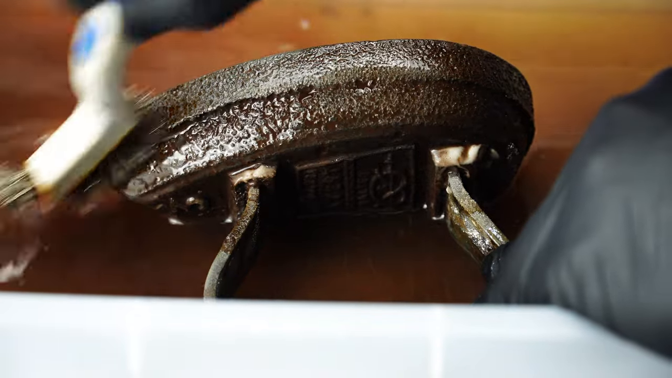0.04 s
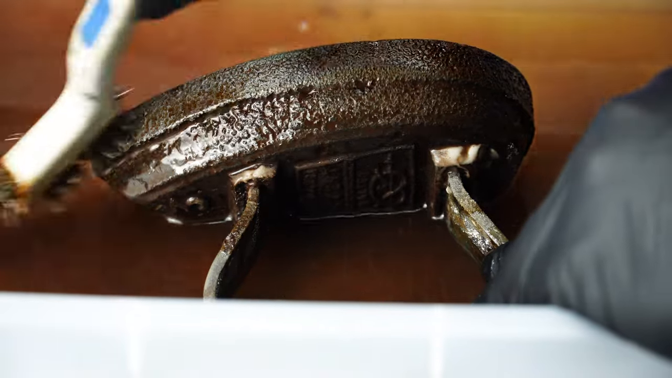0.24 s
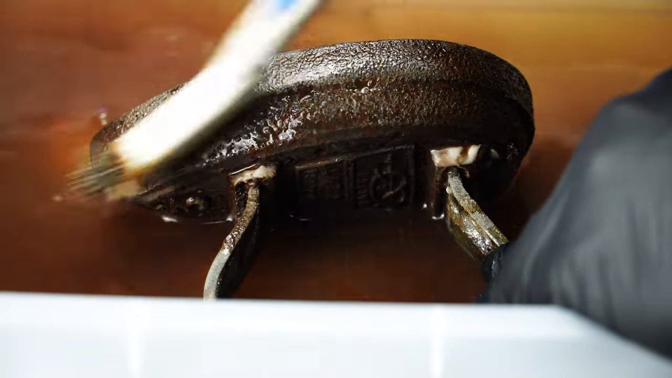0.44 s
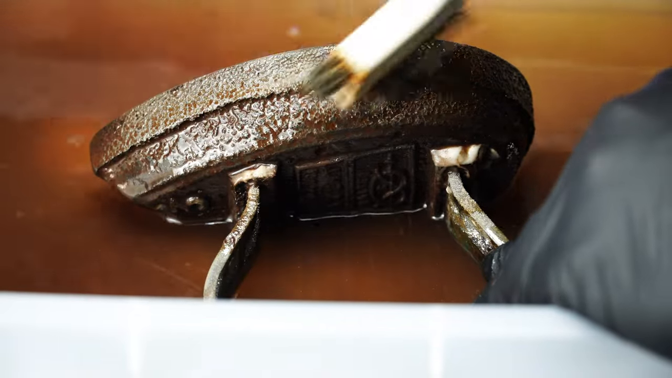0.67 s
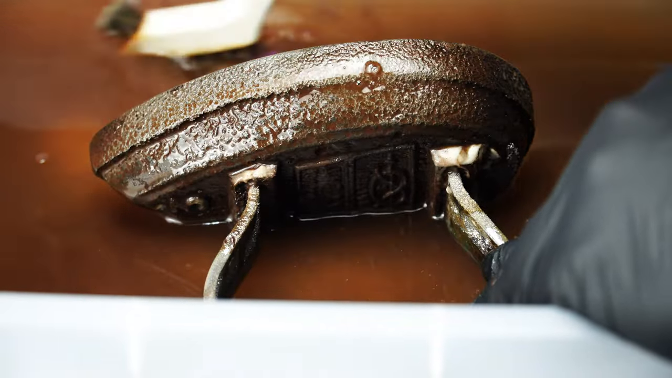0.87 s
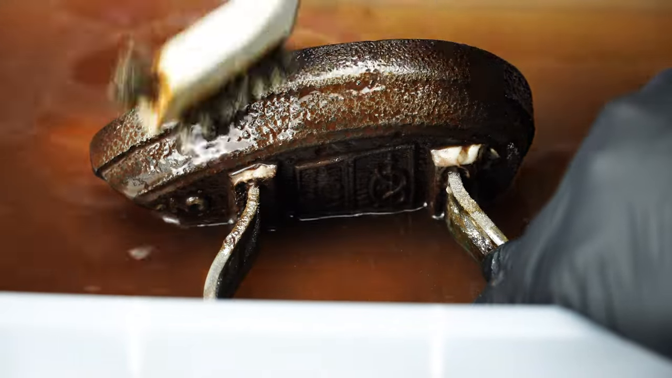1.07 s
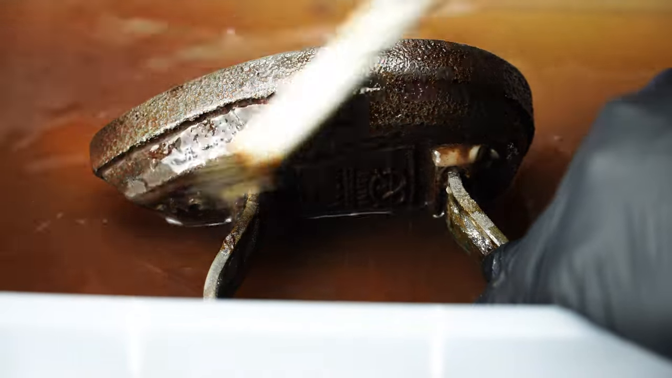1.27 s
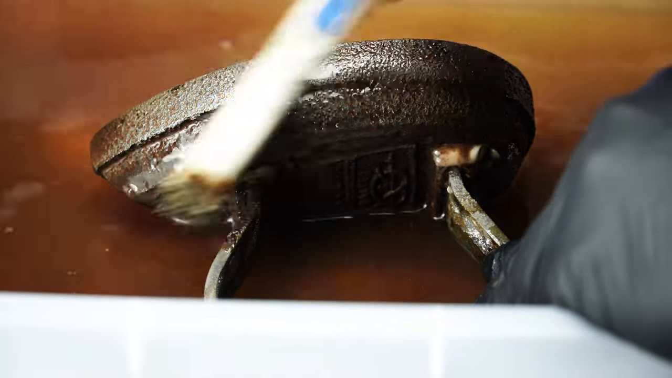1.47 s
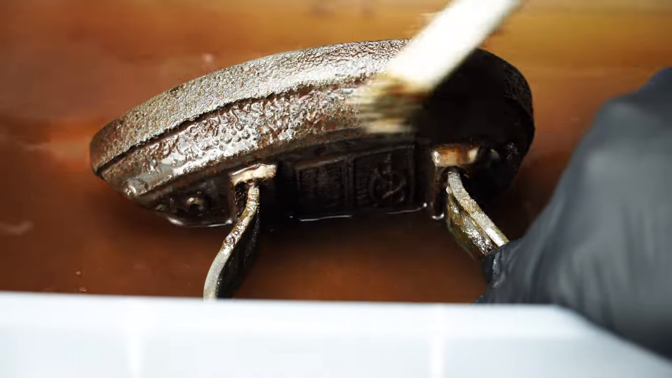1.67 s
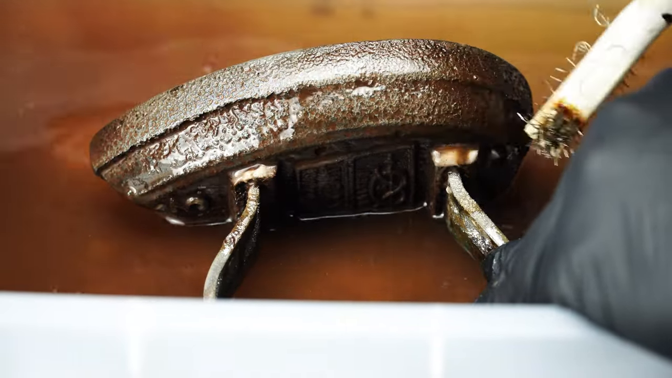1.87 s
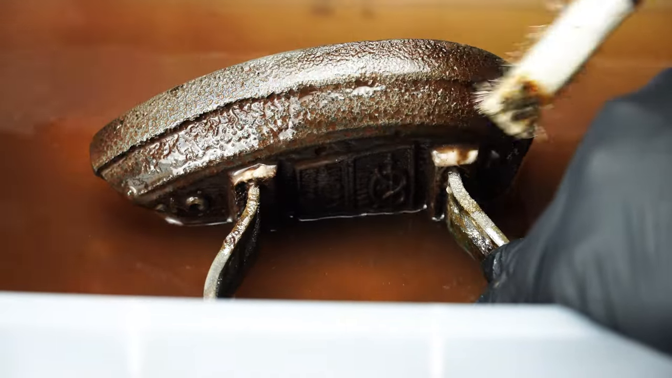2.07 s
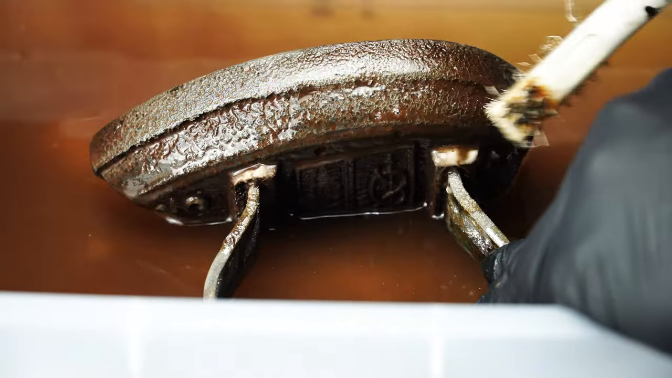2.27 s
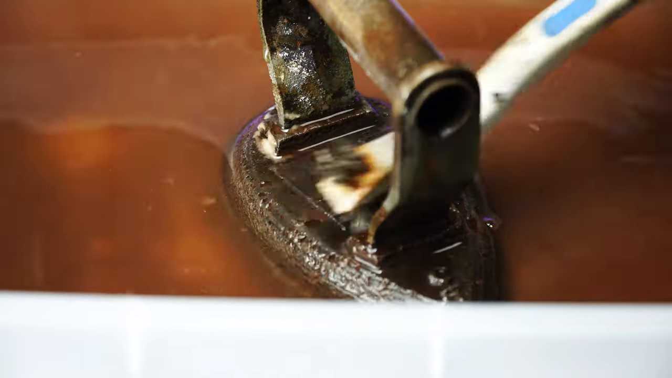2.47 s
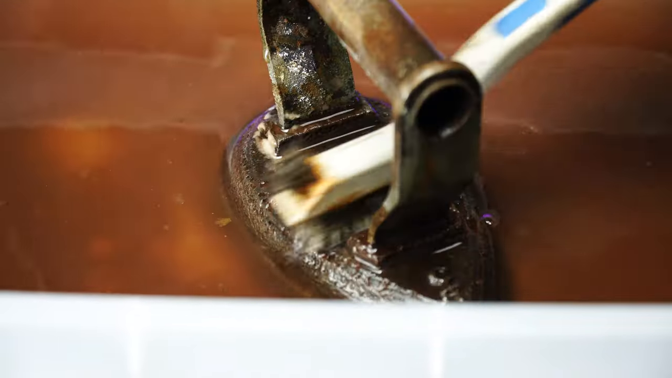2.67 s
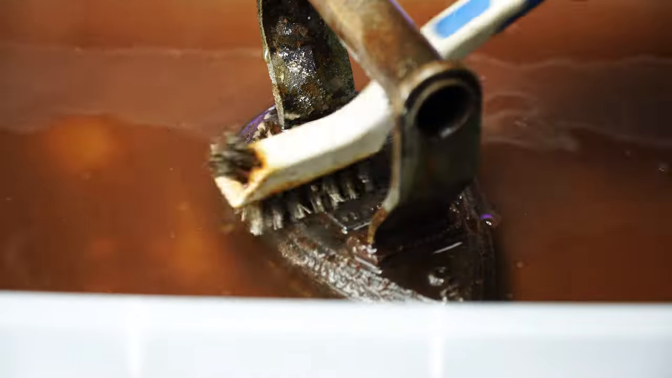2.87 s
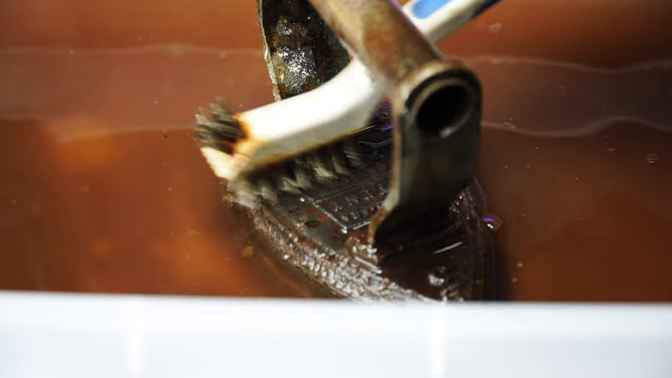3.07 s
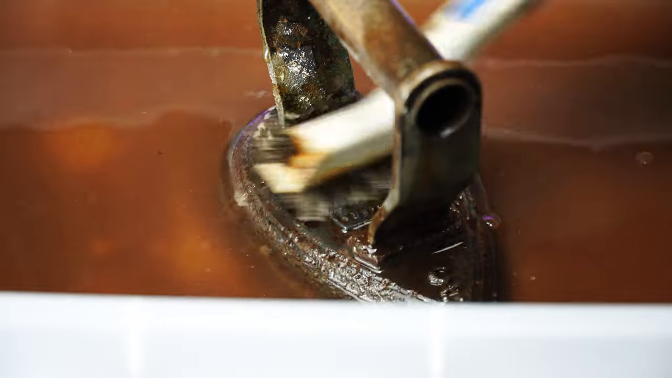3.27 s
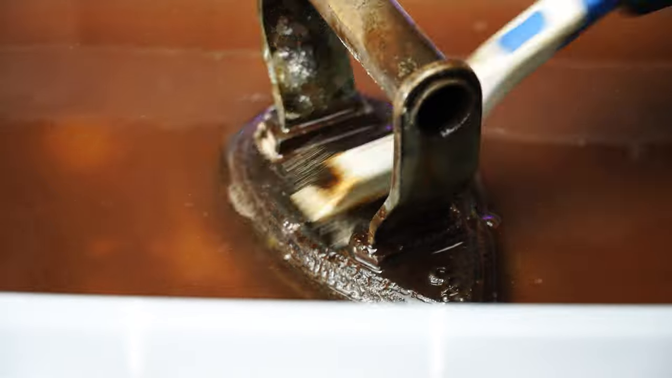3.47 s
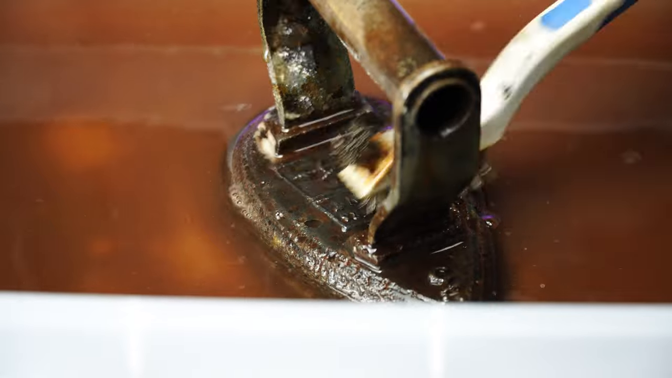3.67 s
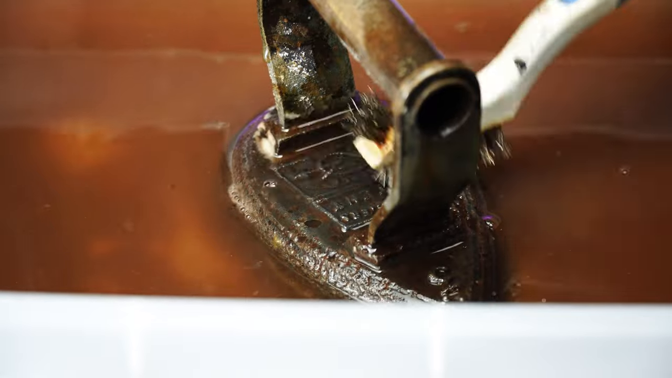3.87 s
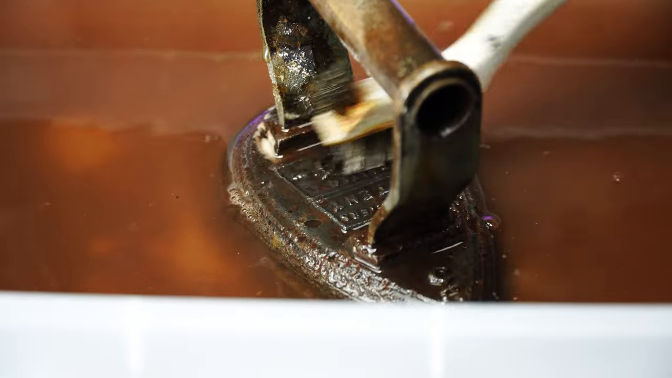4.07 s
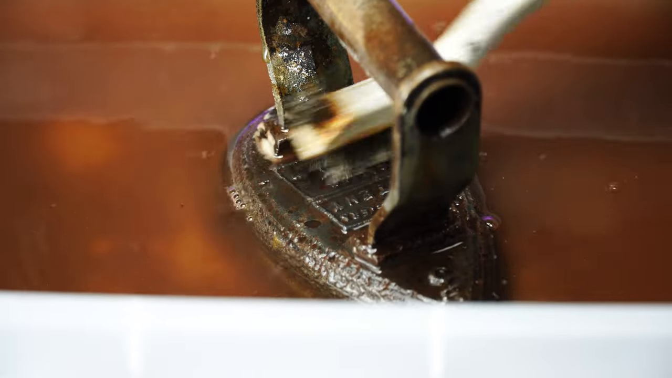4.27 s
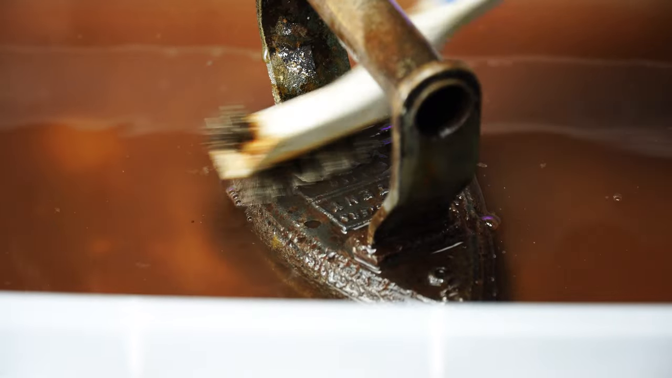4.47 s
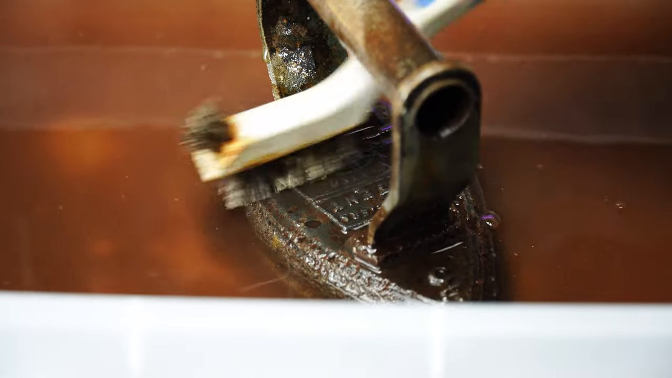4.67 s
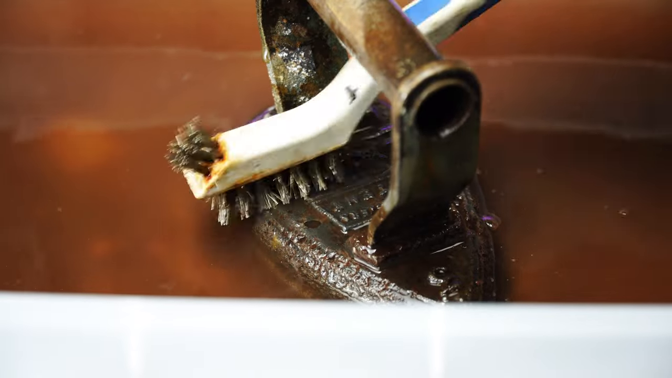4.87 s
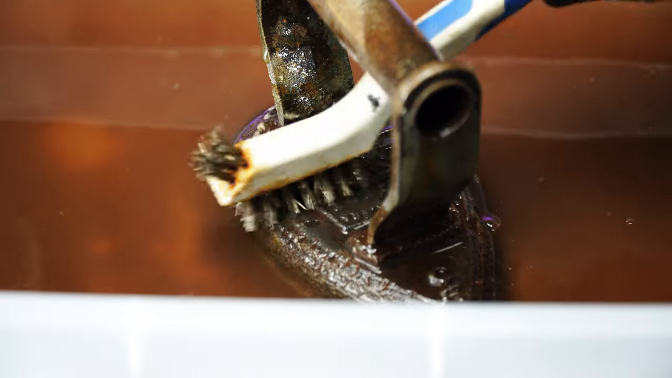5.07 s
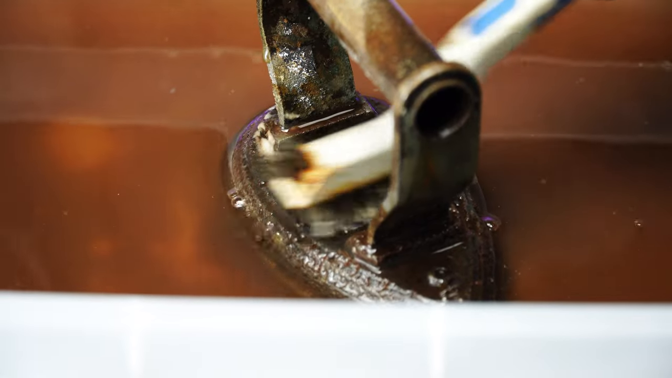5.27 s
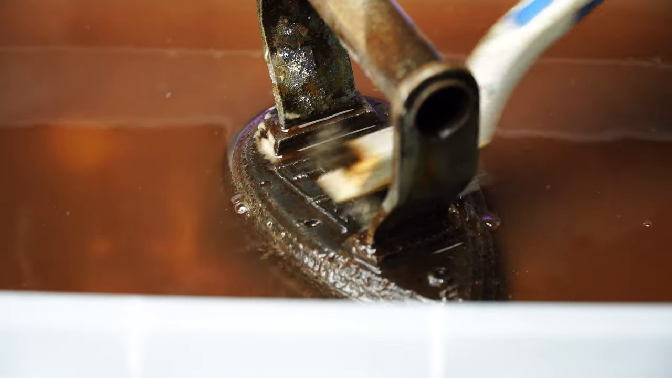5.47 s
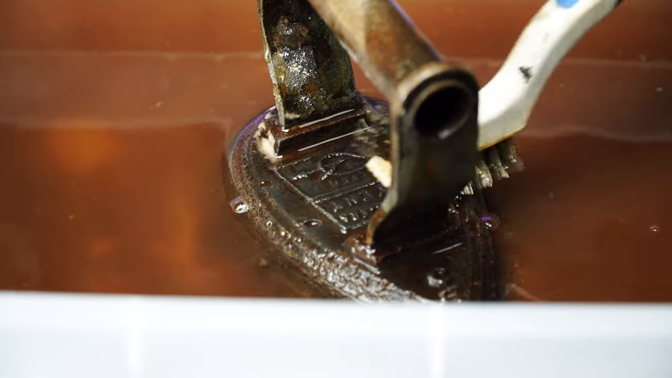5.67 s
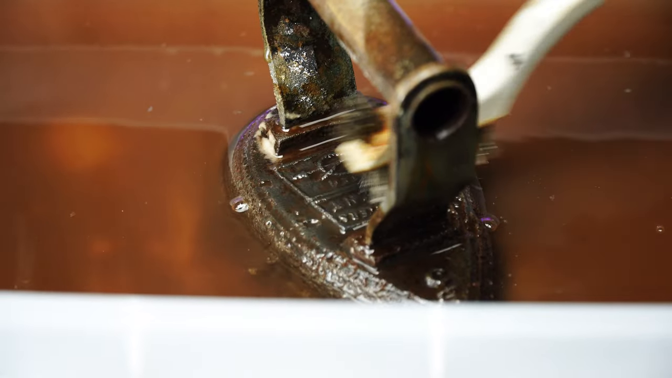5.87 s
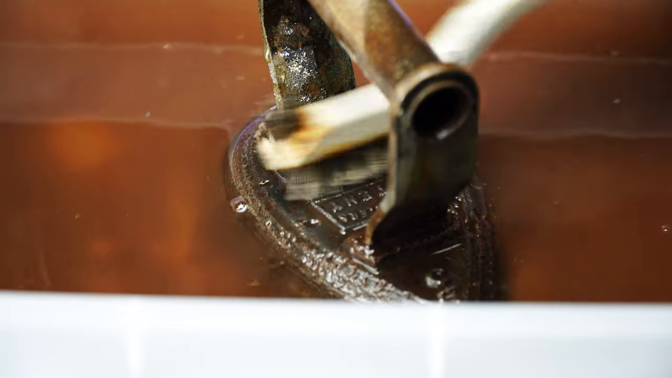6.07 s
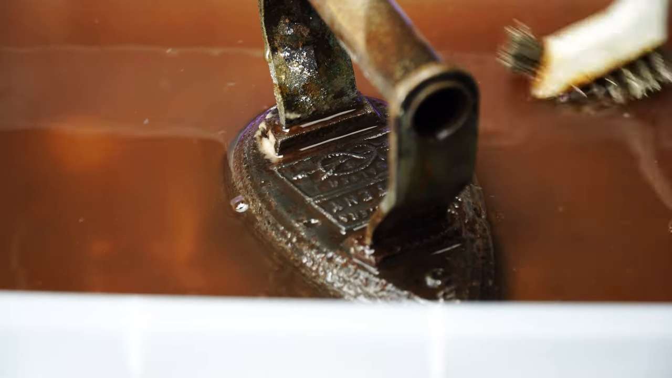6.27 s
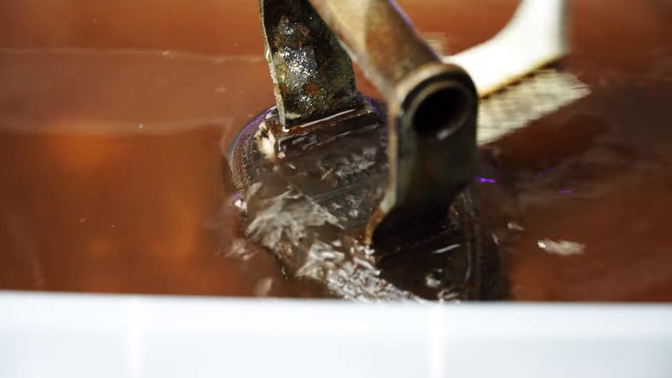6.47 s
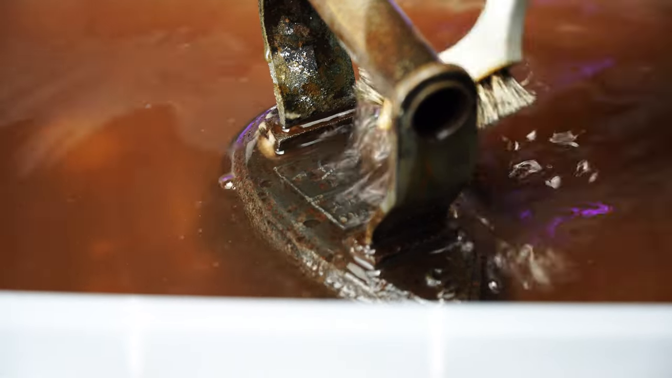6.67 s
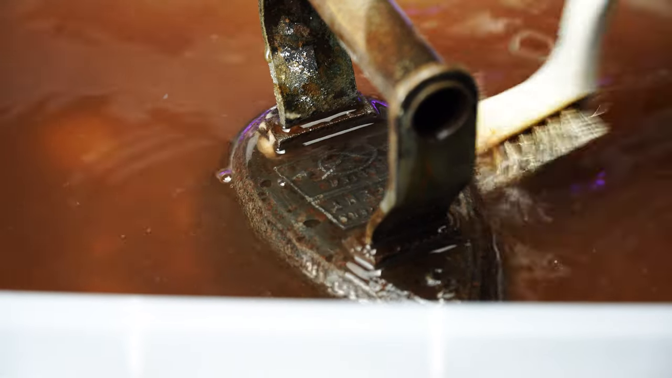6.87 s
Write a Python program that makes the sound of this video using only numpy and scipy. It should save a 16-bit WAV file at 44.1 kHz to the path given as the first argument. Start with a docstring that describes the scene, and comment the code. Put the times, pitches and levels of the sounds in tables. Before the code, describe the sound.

A small brush scrubs rough wet metal in a water-filled plastic tub. The first strokes are crisp and hissy, with low knocks; the brush leaves, dips with a plop and bubbles, and returns unevenly with little squeaks. After a tiny drop in level, about ten fast strokes a second follow, grittier and faintly ringing. Light drips and swishes close it. Dry, close pickup, quiet workshop air.

```python
"""A toothbrush scrubs a wet, rusty flat iron standing in a plastic tub of water: long strokes along the rim.
It pauses, and the brush dips into the water (noise splashes, chirped sine bubbles); the rim strokes resume.
The level dips briefly, then quick strokes run on top until the brush lifts and the water splashes on.
Bristles are dense random clicks that ring the iron's modes; jolts shake the tub's; tufts snag in click bursts.
Quiet workshop air, coloured noise, lies under it all."""
import sys
import numpy as np
from scipy import signal
from scipy.fft import rfft, irfft, next_fast_len
from scipy.io import wavfile
from scipy.ndimage import uniform_filter1d

SR = 44100
rng = np.random.default_rng(int(sys.argv[2]) if len(sys.argv) > 2 else 0)


def transcribe(u):
    """Save the signal u as a 16-bit wav file named by the first command-line argument.

    u: samples, shape (n,) or (channels, n), limited to [-1, 1]; the rate is SR.
    q: integer samples, one column per channel.
    """
    v = np.clip(np.atleast_2d(u).T, -1, 1)
    q = np.round(v * 32767).astype(np.int16)
    wavfile.write(sys.argv[1], SR, q)


N = 305613

# strokes, each until the next turn or lift: (start_s, level_db)
RIM_STROKES = [(-.025, -41), (.067, -38), (.192, -39.5), (.286, -40), (.430, -40), (.576, -40),
               (1.152, -45.5), (1.274, -39.5), (1.464, -40), (1.708, -40), (1.803, -39.5), (1.936, -52.5),
               (2.068, -43.5), (2.161, -41.5), (2.257, -42.5), (2.335, -41), (2.42, -44.5)]
TOP_STROKES = [(2.518, -42), (2.597, -47.5), (2.673, -44.5), (2.774, -40), (2.853, -39.5), (2.945, -43),
               (3.026, -40.5), (3.121, -42.5), (3.204, -41.5), (3.296, -40), (3.378, -38), (3.477, -41),
               (3.564, -38), (3.662, -38.5), (3.738, -37.5), (3.826, -40), (3.927, -37), (4.024, -39.5),
               (4.116, -38), (4.205, -41.5), (4.301, -40), (4.393, -42), (4.486, -38), (4.584, -41),
               (4.668, -36.5), (4.75, -40), (4.844, -38.5), (4.937, -39.5), (5.046, -38.5), (5.128, -40),
               (5.223, -38.5), (5.312, -40.5), (5.387, -38.5), (5.481, -41.5), (5.57, -37.5), (5.662, -39),
               (5.739, -36.5), (5.829, -39.5), (5.906, -39), (6.008, -40), (6.086, -38), (6.179, -43)]
# hand control: (time_s, fastest_point [0-1 of stroke], turn_pause_s [< 0: strokes overlap], rasp_db [before scaling])
RIM_HAND = [(0, 0.59, 0.025, -6.5), (.25, 0.36, 0.011, -1), (.65, 0.44, 0.014, -8),
            (1.2, 0.47, -0.0065, -3), (1.36, 0.41, 0.022, -5), (1.57, 0.41, 0.031, 0.5),
            (1.75, 0.34, 0.0093, -1), (1.86, 0.24, 0.026, -7.5), (2.1, 0.41, 0.023, 0),
            (2.45, 0.5, 0.026, -7.5)]
TOP_HAND = [(2.55, 0.52, 0.031, -1.5), (2.64, 0.36, 0.0027, 3), (2.85, 0.41, 0.012, 0),
            (3.2, 0.5, 0.0039, 1.5), (3.42, 0.4, -0.013, -1.5), (3.62, 0.34, -0.0056, -2.5),
            (3.85, 0.45, -0.0098, -0.5), (4.05, 0.49, 0.015, -0.5), (4.45, 0.32, 0.003, -1),
            (4.62, 0.36, 0.0027, -5.5), (4.98, 0.51, 0.014, -4.5), (5.42, 0.43, 0.0065, -0.5),
            (5.75, 0.53, 0.013, -2), (6.04, 0.44, 0.002, -6.5), (6.22, .44, 0.023, -4)]
# bristle click colour: (freq_hz, level_db)
RIM_HISS = [(530, -22), (900, -14), (1000, -25.5), (1400, -20), (1770, -17), (2070, -7), (2330, -10),
            (3000, -10.5), (3670, -5.5), (4710, -6), (5180, -2.5), (6500, -5.5), (8440, 0.5), (9980, -1.5),
            (15500, -1)]
TOP_HISS = [(530, -16.5), (900, -24.5), (1370, -23), (1750, -18.5), (2400, -14.5), (3110, -8), (4000, -8.5),
            (4710, -6.5), (6970, -8), (8150, -1.5), (9290, -3.5), (15500, -1.5)]
# tub modes, shaken through the iron: (freq_hz, width_hz, level_db)
RIM_TUB = [(44.6, 17, -29), (135.3, 14.7, 0), (169.6, 12, -6.5), (210, 15, 1.5), (308, 18.6, -7),
           (398, 38, -9), (705, 36, -23.5), (795, 120, -29)]
TOP_TUB = [(44, 81, -21), (132.2, 19, -0.5), (159.2, 16.4, 2.5), (224.4, 33, -8), (302, 31.5, -13.5),
           (397, 59, -11.5), (705, 65, -17), (880, 270, -25.5)]
# modes of the iron and its handle: (freq_hz, width_hz, level_db)
IRON_MODES = [(1766, 130, -14), (2164, 45, 0), (2958, 10, 9.5), (4020, 51, -25), (4780, 170, -15),
              (6250, 200, -5), (8040, 230, -5.5), (8170, 160, 0)]


def scrub(strokes, hand, hiss, tub, hiss_db, iron_db, tub_db, iron_gain, tub_gain, click_rate_hz, click_spread_db,
          rough_db, judder_db, push_bite, pull_bite):
    """Bristles flick over the rust, more of them the faster the brush; their drag rings the iron, shakes the tub."""
    speed, stroke_db, rasp_db = motion(strokes, hand, push_bite, pull_bite)
    effort_db = stroke_db - np.median(np.array(strokes)[:, 1])
    force = speed * undb(stroke_db + rough_db * walk(260))

    flicks = clicks(click_rate_hz * (0.2 + speed), click_spread_db)
    bristles = bounce(unit(colour(flicks, hiss)), lag_s=0.0011, share=0.24)
    # bent tufts rasp lower than upright ones
    rasp_gain = undb(1.08 * (rasp_db + 5.5))
    bristles += (rasp_gain - 1) * resonance(bristles, 5510, 2350)
    # five fixed bands of the rasp swell and fade at random, each on its own
    for hz in (3680, 4470, 4950, 6260, 8180):
        band_gain = undb(3.7 * walk(35) - 0.63)
        bristles += (band_gain - 1) * resonance(bristles, hz, hz / 10)

    # hard strokes ring the iron out of proportion; each mode's drive wanders with the touch
    rub = flicks * force * undb(iron_gain * effort_db)
    iron = sum(undb(mode_db + 1.4 * walk(14)) * resonance(rub, hz, width_hz)
               for hz, width_hz, mode_db in IRON_MODES)

    jolts = clicks(2500, 2.24) * undb(judder_db * walk(70))
    judder = ring(jolts, tub, wander_db=3.5)
    # level out slow swings, so that the hand sets each stroke's strength
    judder /= np.sqrt(uniform_filter1d(judder ** 2, size=3000) + 1e-18)
    # drag falls a little more slowly than speed
    drag = speed ** 0.85
    thrum = judder * drag * undb(tub_gain * effort_db)
    return undb(hiss_db) * bristles * force + undb(iron_db) * iron + undb(tub_db) * thrum


# brush leaves the iron: time_s
LIFTS = [0.741, 2.002, 2.502, 6.255]


def motion(strokes, hand, push_bite, pull_bite, rest=0.24, lift_s=0.009, bite_s=0.014, flip_s=0.0083,
           bite_spread_db=0.5):
    """Brush speed (an arch per stroke over a slow creep), each stroke's level and its rasp."""
    t = np.arange(N) / SR
    start_s, level_db = np.transpose(strokes)
    hand_s, *controls = np.transpose(hand)
    turn_s = np.append(start_s[1:], np.inf)
    next_lift_s = np.array([min(s for s in LIFTS if s > a) for a in start_s])
    middle_s = (start_s + np.minimum(turn_s, next_lift_s)) / 2
    fastest, pause_s, rasp_db = (np.interp(middle_s, hand_s, c) for c in controls)
    end_s = np.where(next_lift_s < turn_s, next_lift_s, turn_s - pause_s)

    # pushes and pulls alternate, each with its own bite
    bites = np.resize([push_bite, pull_bite], len(start_s))
    bites = bites * undb(bite_spread_db * rng.standard_normal(len(start_s)))
    on_off_s = [start_s[0] - lift_s / 2, start_s[0], end_s[-1], end_s[-1] + lift_s / 2]
    speed = rest * np.interp(t, on_off_s, [0, 1, 1, 0])
    for a, b, top, bite in zip(start_s, end_s, np.clip(fastest, 0.1, 0.9), bites):
        on = slice(max(int(a * SR), 0), int(b * SR))
        way = np.clip((t[on] - a) / (b - a), 0, 1)
        # skewed arch, peak at way = top
        speed[on] += np.sin(np.pi * way ** (np.log(0.5) / np.log(top)))
        # just after the turn the bent bristles flip over together
        since_s = t[on] - a - flip_s
        speed[on] += bite * (since_s > 0) * np.exp(-np.abs(since_s) / bite_s)

    # in a long gap the brush leaves the iron
    for a, b in zip(end_s[:-1], start_s[1:]):
        if b - a > 0.05:
            off_s = a + 2 * lift_s
            speed *= np.interp(t, [a, off_s, max(b - lift_s / 2, off_s), b], [1, 0, 0, 1])

    # hold each value through its stroke, glide between strokes
    held_s = np.column_stack([start_s + lift_s, end_s - lift_s]).ravel()
    return [speed] + [np.interp(t, held_s, np.repeat(c, 2)) for c in (level_db, rasp_db)]


# tufts that snag hard and snap free: (time_s, level_db)
SNAGS = [(.073, -42), (.196, -33), (0.444, -30.5), (1.167, -38), (1.478, -37), (1.719, -34), (2.168, -39),
         (2.343, -34.5), (2.524, -41), (2.604, -39.5), (2.865, -38), (3.221, -36.5), (3.259, -35.5),
         (3.337, -30), (3.614, -37), (3.669, -35), (3.974, -28.5), (4.123, -41), (4.218, -34), (4.311, -38),
         (4.347, -28.5), (4.523, -35), (4.599, -34), (5.056, -35.5), (5.140, -41), (5.234, -35),
         (5.267, -26.5), (5.444, -30), (5.580, -34.5), (5.674, -38), (5.780, -29), (5.956, -35),
         (6.189, -35)]


def snags(rise_s=0.0032, fall_s=0.0058):
    """A tuft catches and lets go: a short, bright burst of clicks."""
    t, burst = np.arange(N) / SR, np.zeros(N)
    for time_s, level_db in SNAGS:
        near = slice(int((time_s - 4 * rise_s) * SR), int((time_s + 4 * fall_s) * SR))
        since_s = t[near] - time_s
        burst[near] += undb(level_db) * np.exp(np.minimum(since_s / rise_s, -since_s / fall_s))
    return burst * unit(colour(clicks(7000, 1.7), TOP_HISS))


# wet tufts squeak on the metal: (time_s, level_db)
SQUEAKS = [(0.215, -41.5), (0.452, -39.5), (1.228, -43.5), (1.54, -45), (5.013, -42), (5.186, -46),
           (5.360, -45)]


def squeaks(hz=5300, width_hz=700, length_s=0.015):
    """Bristles stick and slip near one pitch for a moment: narrow-band noise under a bell-shaped swell."""
    t, out = np.arange(N) / SR, np.zeros(N)
    for time_s, level_db in SQUEAKS:
        near_s = t[np.abs(t - time_s) < 3 * length_s]
        noise = rng.standard_normal(len(near_s))
        tone = unit(resonance(resonance(noise, hz, width_hz), hz, width_hz))
        swell = np.exp(-((near_s - time_s) / length_s) ** 2)
        add(out, near_s[0], undb(level_db) * tone * swell)
    return out


# hard rubs that make the iron sing: (peak_s, mode_2200hz_db, mode_3000hz_db)
SINGS = [(3.40, -66, -48), (3.47, -68, -48), (3.785, -63, -45), (4.075, -66, -50), (4.164, -51, -61),
         (4.35, -56, -52), (4.525, -50, -44.5), (4.70, -65, -51), (5.27, -53, -59), (5.615, -50, -58.5),
         (5.81, -62, -46.5), (5.936, -61, -48)]


def singing(swell_s=0.01898, fade_s=0.02):
    """A hard rub swells the iron's two clearest modes, which then die away."""
    t, out = np.arange(SR // 6) / SR, np.zeros(N)
    shape = np.minimum(t / swell_s, 1) * np.exp(-np.maximum(t - swell_s, 0) / fade_s)
    for peak_s, *levels_db in SINGS:
        for (hz, _, _), level_db in zip(IRON_MODES[1:3], levels_db):
            phase = 2 * np.pi * rng.random()
            add(out, peak_s - swell_s, undb(level_db) * shape * np.sin(2 * np.pi * hz * t + phase))
    return out


# brush head bumps the iron: (start_s, thud_hz, thud_peak_db, tick_peak_db)
BUMPS = [(0.013, 315, -50, -60), (.125, 430, -58, -60), (0.21, 278, -45.5, -58), (.232, 300, -47, -60),
         (0.469, 137, -43, -59), (.494, 135, -41.5, -44), (.535, 135, -44, -60), (.645, 222, -47, -60),
         (1.118, 155, -31.5, -33), (1.118, 242, -40, -60), (1.34, 144, -42.5, -60), (1.368, 135, -44, -60),
         (1.654, 224, -47, -60), (1.711, 333, -45.5, -60), (1.808, 292, -43, -65), (1.828, 348, -42.5, -82),
         (1.849, 226, -41.5, -60), (2.036, 143, -42, -62), (2.105, 330, -53, -60), (2.254, 214, -43.5, -51),
         (2.267, 370, -45, -60), (2.354, 350, -52, -60), (2.429, 340, -46, -64), (2.462, 257, -42.5, -58),
         (2.875, 157, -42.5, -57), (3.12, 160, -41, -54), (3.476, 159, -38, -75), (3.533, 166, -49, -60),
         (3.864, 150, -39, -66), (3.896, 161, -43, -60), (4.947, 151, -42, -55), (5.071, 158, -46, -60),
         (5.232, 157, -38, -50), (5.783, 140, -39, -63), (6.238, 160, -47, -64)]


def bumps(rise_s=0.0034, thud_s=0.011, tick_s=0.0019, knock_db=-13):
    """The plastic head ticks on the iron; the tub answers with a low thud and a knock of its upper resonances."""
    t, out = np.arange(SR // 8) / SR, np.zeros(N)
    knock = sum(np.sin(2 * np.pi * hz * t) * np.exp(-np.pi * width_hz * t) for hz, width_hz, _ in RIM_TUB[4:6]) / 2
    for start_s, thud_hz, thud_db, tick_db in BUMPS:
        thud = np.sin(2 * np.pi * thud_hz * t) * (1 - np.exp(-(t / rise_s) ** 2)) * np.exp(-t / thud_s)
        tick = rng.standard_normal(len(t)) * np.exp(-t / tick_s)
        tick = resonance(resonance(tick, 3500, 3500), 3600, 2100)
        answer = thud / np.abs(thud).max() + undb(knock_db) * knock
        add(out, start_s, undb(thud_db) * answer + undb(tick_db) * tick / np.abs(tick).max())
    return out


# splashes, deep plops to high spatter: (start_s, level_db, centre_hz, decay_s)
SPLASHES = [(0.822, -64, 4470, 0.027), (.884, -49, 3580, 0.0016), (.910, -43.5, 440, 0.009),
            (0.912, -62, 2660, 0.018), (.915, -56.5, 854, 0.068), (0.988, -55.5, 253, 0.0076),
            (0.992, -60.5, 4170, 0.017), (1.006, -48, 6850, 0.0014), (1.021, -55.5, 9400, 0.0087),
            (1.097, -58.5, 3700, 0.016), (1.116, -54.5, 7000, 0.021), (2.034, -58.5, 6370, 0.014),
            (2.380, -54.5, 720, 0.026), (6.309, -55.5, 4140, 0.0057), (6.327, -58.5, 840, 0.011),
            (6.366, -53.5, 565, 0.00997), (6.368, -61, 3220, 0.02), (6.44, -58, 4170, 0.015),
            (6.579, -65.5, 3480, 0.021), (6.580, -73, 550, 0.047), (6.638, -68.5, 2510, 0.014),
            (6.688, -63.5, 157, 0.013), (6.692, -58.5, 3460, 0.0084), (6.747, -70, 4500, 0.0027),
            (6.822, -72, 5000, .01), (6.838, -59.5, 3220, 0.0095), (6.838, -70, 720, 0.024),
            (6.885, -61, 2960, 0.002)]
# bubbles: (start_s, start_hz, tone_peak_db, t60_s)
BUBBLES = [(0.913, 360, -43, 0.04), (.913, 849, -48.5, 0.21), (0.917, 1050, -57, .1),
           (0.998, 1302, -52, 0.07), (1.005, 1335, -40.5, 0.025), (1.009, 1340, -58, 0.23),
           (2.378, 693, -48, 0.17), (6.371, 690, -56, .05), (6.434, 2200, -49, 0.018),
           (6.444, 4480, -53, 0.021), (6.599, 3300, -51.5, .016), (6.698, 2110, -55.5, .045),
           (6.884, 3020, -46.5, 0.015)]


def water(glide_per_s=0.28, mist_db=-9, iron_db=-3, breadth=1.97, rise_share=0.55, longest_rise_s=0.0088,
          wash_db=-24, wash_s=0.053, pop_db=-10, pop_s=0.0019, droplet_db=-3):
    """Splashes are crackle and droplets under a fine mist; trapped bubbles pop, ring and rise a little in pitch."""
    t, out = np.arange(SR // 4) / SR, np.zeros(N)
    crackle = clicks(7800, 3.4)
    for start_s, level_db, hz, decay_s in SPLASHES:
        drops = np.roll(crackle, -int(start_s * SR))[:len(t)]
        spray = unit(resonance(resonance(drops, hz, breadth * hz), hz, breadth * hz))
        # deep plops throw less mist than high spatter
        mist = min(hz / 3000, 1) ** 2 * unit(resonance(drops[::-1], 14300, 3600))
        spray += undb(mist_db) * mist
        # short splashes start sharply; each leaves a faint wash
        rise_s = min(rise_share * decay_s, longest_rise_s)
        after_s = np.maximum(t - rise_s, 0)
        fall = np.exp(-after_s / decay_s) + undb(wash_db) * np.exp(-after_s / wash_s)
        add(out, start_s, undb(level_db) * spray * np.minimum(t / rise_s, 1) * fall)
        add(out, start_s + rise_s / 2, undb(level_db + droplet_db) * droplets(hz, decay_s))
    # drops that land on the iron ring it faintly
    rung = sum(undb(mode_db) * resonance(out, hz, width_hz) for hz, width_hz, mode_db in IRON_MODES[1:3])
    out += undb(iron_db) * rung
    for start_s, hz, peak_db, t60_s in BUBBLES:
        tone = undb(-60 * t / t60_s) * np.sin(2 * np.pi * hz * t * (1 + glide_per_s * t))
        pop = resonance(rng.standard_normal(len(t)), 3500, 8000) * np.exp(-t / pop_s)
        add(out, start_s, undb(peak_db) * (tone + undb(pop_db) * pop))
    return out


def droplets(hz, decay_s, spread=0.25, cycles=7, count=8):
    """A few tiny bubbles scattered in time and pitch after a splash, each a decaying sine."""
    t, out = np.arange(SR // 4) / SR, 0
    waits_s = rng.exponential(decay_s, count)
    for wait_s, pitch, size in zip(waits_s, rng.standard_normal(count), rng.random(count)):
        turns = min(hz * np.exp(spread * pitch), 0.35 * SR) * np.maximum(t - wait_s, 0)
        strength = size * np.exp(-wait_s / (2 * decay_s))
        out = out + strength * np.sin(2 * np.pi * turns) * np.exp(-turns / cycles)
    return out


def settling(froth_db=-71, hz=6000, width_hz=9000, froth_s=0.12, slosh_db=-70, slosh_s=0.15, uneven_db=3):
    """Whenever the brush lifts, its froth fizzes away and the water sloshes to rest against the tub."""
    t = np.arange(N) / SR

    def fade(length_s):
        """Sudden start at each lift, exponential decay."""
        return sum((t > s) * np.exp(-np.abs(t - s) / length_s) for s in LIFTS)

    froth = fade(froth_s) * unit(resonance(clicks(4300, 4.3), hz, width_hz))
    slosh = fade(slosh_s) * undb(uneven_db * walk(16)) * unit(ring(rng.standard_normal(N), RIM_TUB))
    return undb(froth_db) * froth + undb(slosh_db) * slosh


def lapping(level_db=-78, spread_db=2, hz=2600, width_hz=4200):
    """The stirred water keeps fizzing faintly against the iron: sparse band-passed clicks."""
    fizz = resonance(resonance(clicks(1000, 1.6), hz, width_hz), hz, width_hz)
    return undb(level_db + spread_db * walk(19)) * unit(fizz)


# workshop air colour: (freq_hz, level_db)
AIR = [(25, 5), (90, -4), (135, 9), (175, 3), (215, 0.5), (330, -2), (500, -9.5), (900, -5.5), (1500, -19),
       (2800, -25), (6500, -29), (10000, -19), (15000, -31)]


def workshop_air(level_db=-74.5):
    """Quiet air of the workshop: steady coloured noise."""
    return undb(level_db) * unit(colour(rng.standard_normal(N), AIR))


def reflections(x, t60_s):
    """Dense, short echoes from the tub walls and the bench: convolution with decaying noise."""
    t = np.arange(SR // 3) / SR
    echo = rng.standard_normal(len(t)) * undb(-60 * t / t60_s) * (t > 0.002)
    echo = echo[t < t60_s]
    return signal.oaconvolve(x, echo / np.linalg.norm(echo))[:N]


def shifting(x, t60_s):
    """Changing diffuse spread: four decaying-noise echo patterns blend by a steady turn and a random wander."""
    angle = 2 * np.pi * np.arange(N) / SR * 1.7 + walk(6)
    weights = (np.cos(angle), np.sin(angle), np.cos(2 * angle), np.sin(2 * angle))
    return sum(weight * reflections(x, t60_s) for weight in weights) / np.sqrt(2)


def bounce(x, lag_s, share):
    """An echo off a near surface; the length of its path wanders."""
    i = np.arange(N)
    lag = np.round(lag_s * SR * np.exp(0.12 * walk(9))).astype(int)
    return (x + share * x[np.maximum(i - lag, 0)]) / np.hypot(1, share)


def undb(db):
    """Decibels to gain."""
    return 10 ** (np.asarray(db) / 20)


def unit(x):
    """Scale to rms 1."""
    return x / np.sqrt(np.mean(x ** 2))


def resonance(x, hz, width_hz):
    """Two-pole band-pass, gain 1 at the centre."""
    hz = min(hz, 0.45 * SR)
    b, a = signal.iirpeak(hz, hz / min(width_hz, 0.4 * SR), SR)
    return signal.lfilter(b, a, x + 1e-18)


def ring(x, modes, wander_db=0):
    """A body's resonances under one force, signs alternating; each mode's drive wanders."""
    return sum((-1) ** k * undb(mode_db + wander_db * walk(11)) * resonance(x, hz, width_hz)
               for k, (hz, width_hz, mode_db) in enumerate(modes))


def colour(x, points):
    """Filter by a (freq_hz, level_db) spectrum, interpolated over log frequency."""
    size = next_fast_len(N)
    hz, db = np.transpose(points)
    bins_hz = np.maximum(np.arange(size // 2 + 1) * SR / size, 1)
    gain = undb(np.interp(np.log(bins_hz), np.log(hz), db))
    return irfft(rfft(x, size) * gain, size)[:N]


def walk(rate_hz):
    """Random wander: straight lines between normal knots of spread 0.92."""
    knots = rng.standard_normal(int(rate_hz * N / SR) + 2)
    return 0.92 * np.interp(np.arange(N) * rate_hz / SR, np.arange(len(knots)), knots)


def clicks(rate_hz, spread_db):
    """Random tiny impacts of uneven size, rms 1; a changing rate leaves the expected power steady."""
    chance = np.clip(rate_hz / SR, 0.001, 1)
    hit = rng.random(N) < chance
    size = rng.choice([-1, 1], N) * undb(spread_db * rng.standard_normal(N))
    return unit(hit * size / np.sqrt(chance))


def add(track, start_s, sound):
    """Mix a sound in at a time."""
    i = max(int(start_s * SR), 0)
    track[i:i + len(sound)] += sound[:N - i]


# stereo side level by frequency: (freq_hz, level_db)
WIDTH = [(60, -22), (200, -25), (320, -24), (600, -11), (1200, -10), (2500, -12.5), (5000, -14),
         (12000, -14.2)]
# colour of the workshop's late reflections: (freq_hz, level_db)
ROOM = [(60, -21), (140, -16), (230, -20), (400, -35), (1000, -20), (3000, -34), (12000, -42)]


def scene():
    """Every source sits straight ahead; the changing spread, the scattered water and the air give width."""
    rim = scrub(RIM_STROKES, RIM_HAND, RIM_HISS, RIM_TUB, hiss_db=1.9, iron_db=-19, tub_db=-52.5,
                iron_gain=0.2, tub_gain=0.73, click_rate_hz=14000, click_spread_db=2.0,
                rough_db=1.07, judder_db=0.0, push_bite=0.2, pull_bite=0.28)
    top = scrub(TOP_STROKES, TOP_HAND, TOP_HISS, TOP_TUB, hiss_db=-0.3, iron_db=-2, tub_db=-52.5,
                iron_gain=0.13, tub_gain=0.24, click_rate_hz=14000, click_spread_db=2.8,
                rough_db=1.5, judder_db=2.5, push_bite=0.15, pull_bite=0.14)
    wet = water() + lapping()
    direct = rim + top + snags() + squeaks() + singing() + bumps() + wet + settling()
    scattered = undb(-13) * reflections(wet, t60_s=0.08)
    spread = colour(shifting(direct, t60_s=0.069), WIDTH)
    side = spread + scattered + undb(-19) * workshop_air()
    blur = undb(-12) * shifting(direct, t60_s=0.09)
    late = colour(reflections(direct, t60_s=0.43), ROOM)
    mid = direct + workshop_air() + blur + late
    return np.array([mid + side, mid - side])


# brief level dip before the strokes on top: (from_s, to_s, depth_db)
DROPOUT = (2.505, 2.517, -22)


def record(dry, top_hz=15800):
    """The level dips once, briefly; a steep elliptic low-pass cuts the top."""
    t = np.arange(N) / SR
    from_s, to_s, depth_db = DROPOUT
    inside = 1.0 * ((t > from_s) & (t < to_s))
    gain = undb(depth_db * uniform_filter1d(inside, size=90))
    low_pass = signal.ellip(12, 0.1, 80, top_hz, fs=SR, output="sos")
    return signal.sosfilt(low_pass, dry * gain)


dry = scene()
out = record(dry)
transcribe(out)
```